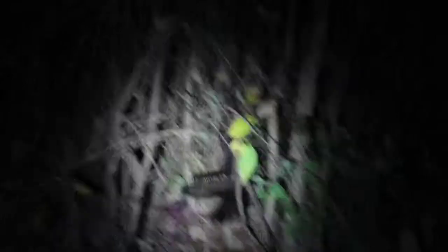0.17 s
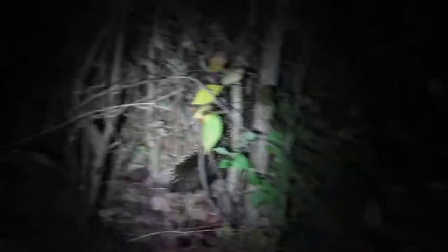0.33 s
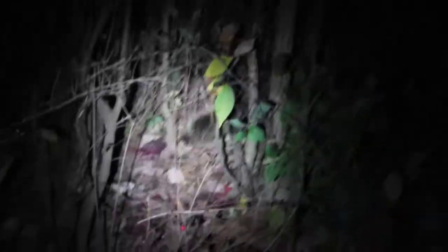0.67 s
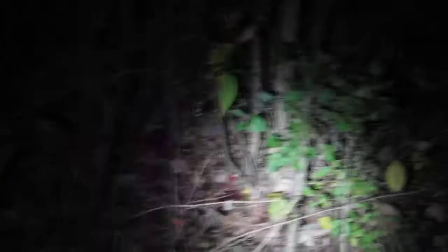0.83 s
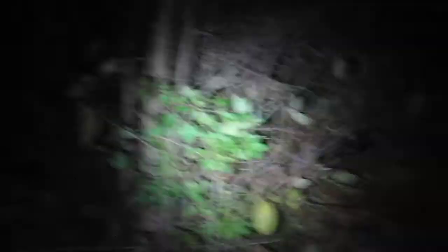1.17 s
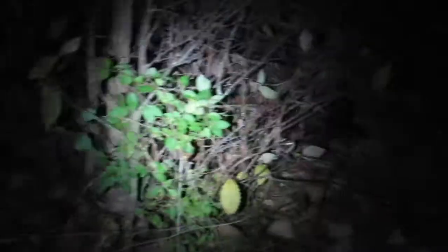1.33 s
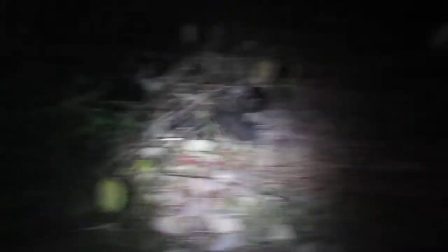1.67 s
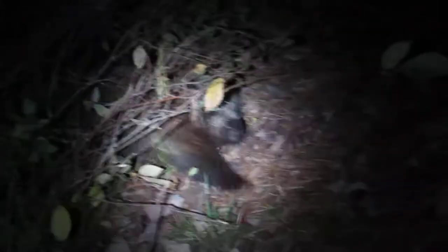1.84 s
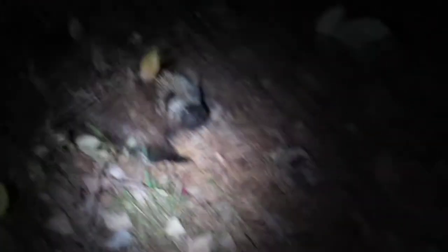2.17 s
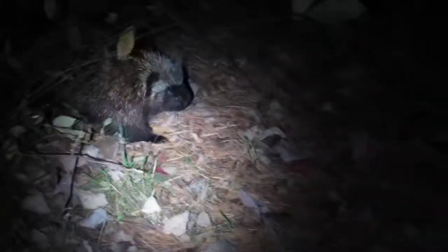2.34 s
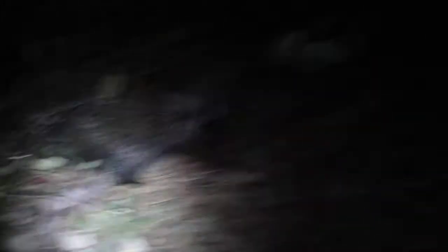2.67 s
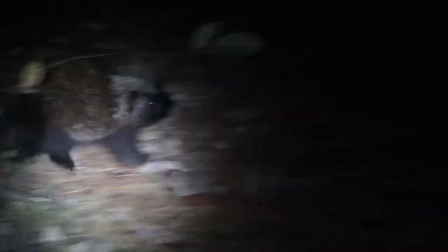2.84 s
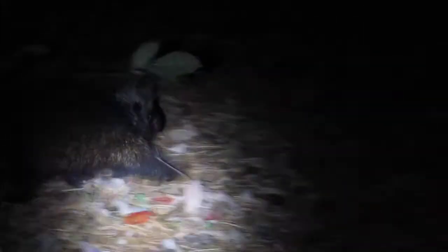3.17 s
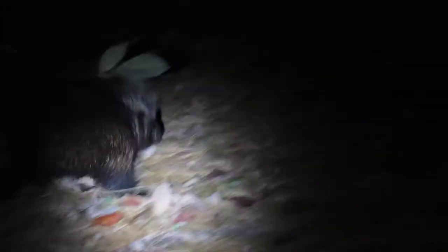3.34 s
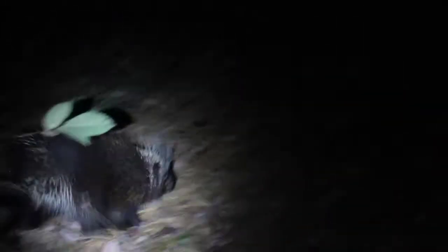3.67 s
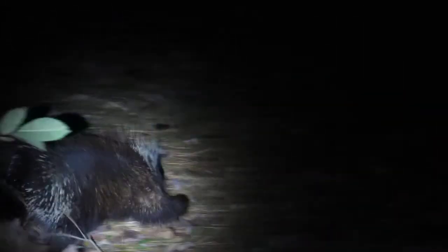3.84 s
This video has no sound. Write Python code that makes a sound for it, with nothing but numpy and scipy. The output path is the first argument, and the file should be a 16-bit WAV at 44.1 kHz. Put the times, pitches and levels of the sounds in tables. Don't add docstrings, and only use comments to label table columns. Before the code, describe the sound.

Crisp leaves crackle under an animal and nearby footsteps in a quiet dark forest

```python
import sys
import numpy as np
from scipy import signal
from scipy.fft import rfft, irfft, next_fast_len
from scipy.io import wavfile

SR = 44100
rng = np.random.default_rng(int(sys.argv[2]) if len(sys.argv) > 2 else 0)


def voltage_ratio(level):
    return 10 ** (np.asarray(level, float) / 20)


def unload_audio(sound):
    columns = np.transpose(np.atleast_2d(sound))
    steps = np.round(np.clip(columns, -1, 1) * 32767)
    wavfile.write(sys.argv[1], SR, steps.astype(np.int16))


N = 176400
SECONDS = np.arange(N) / SR
SIZE = next_fast_len(N + 8192)
HZ = np.maximum(np.arange(SIZE // 2 + 1) * SR / SIZE, 1)


def in_time(rows):
    return np.interp(SECONDS, *np.transpose(rows))


def colour(points, hz=HZ):
    table_hz, table_db = np.transpose(points)
    return voltage_ratio(np.interp(np.log(hz), np.log(table_hz), table_db))


def drift(rate_hz):
    knots = rng.standard_normal(int(N / SR * 400) + 2)
    return np.interp(SECONDS * rate_hz, np.arange(len(knots)), knots) * 1.22


def noise(spectrum, alike):
    white = rng.standard_normal((3, SIZE))
    pair = np.sqrt(alike) * white[2] + np.sqrt(1 - alike) * white[:2]
    coloured = irfft(rfft(pair) * colour(spectrum) * (HZ > 19), SIZE)[:, :N]
    return coloured / np.sqrt(np.mean(coloured ** 2) + 1e-20)


# frequency in Hz, level in dB.
NIGHT_SPECTRUM = [(29, -19), (50, -0.5), (189, -13), (261, -14), (859, -22), (1060, -17), (1270, -20.5),
                  (2800, -23), (5140, -26), (12000, -28), (15600, -68), (22000, -120)]


def night():
    return voltage_ratio(-53 - 4.5) * noise(NIGHT_SPECTRUM, alike=0.73)


# time in seconds, level in dB.
GUST_LEVEL = [(0.08, -68), (0.13, -103), (1.52, -59), (2.3, -68), (2.91, -48), (3.34, -65), (3.44, -50),
              (3.58, -60), (3.79, -54.5), (3.82, -71), (3.87, -52), (4.0, -64)]
# frequency in Hz, level in dB.
AIR_SPECTRUM = [(11, -43), (24, 5.5), (62, -5.5), (79, -5.5), (107, -28.5), (250, -21), (320, -27),
                (550, -120)]


def air():
    lumps_db = 1.5 * np.array([drift(5.0), drift(4.77)])
    port_db = [[-0.8], [2.5]]
    return voltage_ratio(in_time(GUST_LEVEL) + lumps_db + port_db) * noise(AIR_SPECTRUM, alike=0.47)


def footfalls(rows):
    power = 1e-12
    for peak_s, db, rise_s, fall_s in rows:
        away = np.abs(SECONDS - peak_s) / np.where(SECONDS < peak_s, rise_s, fall_s)
        power = power + voltage_ratio(2 * (db - 6 * away ** 1.6))
    return power


def fizz(clicks, t60_s, db):
    alike = 0.57
    decay = voltage_ratio(-120 / (t60_s * SR))
    white = rng.standard_normal((2, len(clicks)))
    pair = np.array([white[0], alike * white[0] + np.sqrt(1 - alike ** 2) * white[1]])
    tail_power = signal.lfilter([0, 1 - decay], [1, -decay], clicks ** 2 + 1e-30)
    return clicks + voltage_ratio(db) * np.sqrt(tail_power) * pair


def heard(clicks, hz, cycles, lag, pan_db, size=SIZE, order=1):
    freq = np.arange(size // 2 + 1) * SR / size
    x = 1j * freq / hz
    late = np.exp(-2j * np.pi * freq / SR * np.array([[lag + 8], [8]]))
    ring = (x / cycles / (1 + x ** 2 + x / cycles)) ** order
    return rfft(clicks, size) * ring * late * voltage_ratio([[pan_db / 2], [-pan_db / 2]])


def cracks(power, spectrum, per_s, spread_db, clump_db, cycles, lag, lag_spread, pan_db, fizz_db, tilt_db=0):
    sizes = voltage_ratio(spread_db * np.minimum(rng.exponential(1, N), 4.0)) * rng.choice([-1, 1], N)
    busy = (power / power.mean()) ** 0.3
    born = rng.random(N) < per_s * busy * voltage_ratio(clump_db * drift(60)) / SR
    loudness = np.sqrt(power / np.clip(busy, 1e-3, SR / per_s))
    clicks = sizes * born / np.sqrt(np.mean(sizes ** 2) * per_s / SR) * loudness
    leaf = rng.integers(0, 18, N)
    out = 0
    for k, hz in enumerate(np.geomspace(250, 13000, num=18)):
        patchy_db = 1.4 * drift(16)
        gain = voltage_ratio(patchy_db + tilt_db * np.log2(hz / 5000)) * colour(spectrum, hz)
        own = gain / np.sqrt(hz / 4000)
        torn = fizz(clicks * (leaf == k) * own, 0.045, fizz_db)
        out = out + heard(torn, hz, cycles, lag + lag_spread * (k % 3 - 1), pan_db)
    return irfft(out, SIZE)[:, :N]


# time in seconds, level in dB.
STIRRING = [(.08, -52.5), (.3, -71), (.5, -64), (.56, -56.5), (.585, -55), (.85, -50.5), (.98, -53.5),
            (1.06, -50), (1.6, -49), (1.8, -44.5), (2.0, -51.5), (2.35, -55.5), (2.38, -47), (2.7, -49),
            (2.96, -50), (3.2, -50), (3.52, -44.5), (3.75, -52.5)]
# peak in seconds, level in dB, rise in seconds, fall in seconds.
CRISP_STEPS = [(.262, -49.5, 0.071, 0.03), (.348, -48, 0.0062, 0.013), (.578, -50, 0.0037, 0.041),
               (.689, -49, 0.084, 0.089), (.80, -71, .01, 0.043), (1.032, -46.5, 0.032, 0.013),
               (1.118, -46, 0.05, 0.032), (1.205, -50, 0.029, 0.028), (1.338, -47.5, 0.042, 0.01),
               (1.426, -48, 0.033, 0.14), (1.665, -41, 0.015, 0.016), (1.702, -35, 0.05, 0.042),
               (1.912, -41.5, 0.035, 0.036), (2.111, -58, 0.023, 0.014), (2.39, -57, 0.013, .03),
               (2.444, -45, 0.07, 0.018), (2.595, -43, 0.038, 0.028), (2.69, -43, 0.028, 0.015),
               (2.769, -36, 0.012, 0.01), (2.888, -46.5, 0.19, 0.019), (3.011, -42, 0.0091, 0.011),
               (3.086, -43.5, 0.035, 0.1), (3.278, -44, 0.0052, 0.017), (3.405, -35.5, 0.021, .045),
               (3.62, -41.5, 0.0078, 0.0091), (3.677, -47.5, 0.0018, 0.0023), (3.79, -44.5, 0.0062, 0.017),
               (3.831, -47.5, 0.0019, 0.013), (3.905, -44.5, 0.038, 0.047), (3.95, -39.5, 0.019, 0.028)]
# frequency in Hz, level in dB.
LEAF_SPECTRUM = [(200, -20.5), (600, -15), (1500, -13), (3000, -5), (6000, 0), (9000, -1), (13000, 0.5)]
# time in seconds, tilt in dB per octave.
LEAF_DRYNESS = [(.1, 0.5), (.25, -2), (.6, 0), (.95, -2), (1.6, 0.1), (1.7, 0.7), (1.9, 0.4), (2.3, -3.1),
                (2.42, 0), (2.6, -1.5), (2.78, 0.5), (2.9, -1.6), (3.1, -0.5), (3.3, -1), (3.41, 2),
                (3.6, -1.65), (3.9, -1), (4.0, 0.5)]


def leaves():
    power = voltage_ratio(2 * in_time(STIRRING)) + footfalls(CRISP_STEPS)
    return voltage_ratio(7.5) * cracks(power, LEAF_SPECTRUM, per_s=7000, spread_db=0.0, clump_db=1.53, cycles=2.15,
                             lag=0.55, lag_spread=1.0, pan_db=-1.24, fizz_db=0,
                             tilt_db=in_time(LEAF_DRYNESS))


# peak in seconds, level in dB, rise and fall in seconds.
HEAVY_STEPS = [(.155, -55, 0.0062, 0.042), (.262, -51.5, 0.01, 0.0127), (1.70, -46, 0.06, 0.021),
               (1.91, -67.5, 0.014, 0.017), (2.43, -56, 0.019, 0.028), (2.54, -46.5, 0.0069, 0.065),
               (2.576, -47, 0.014, 0.011), (2.615, -56.5, 0.02, 0.03), (2.648, -47, 0.035, 0.027),
               (2.853, -44, 0.0028, 0.007), (2.885, -49, 0.01, 0.014), (3.005, -55, 0.027, 0.013),
               (3.415, -66, 0.027, 0.021), (3.62, -62, 0.01, .015), (3.91, -55, 0.018, 0.029)]
# frequency in Hz, level in dB.
TREAD_SPECTRUM = [(200, -14), (600, -14.5), (1100, -4), (2000, -1.5), (4000, -5), (9000, -34)]


def treads():
    power = footfalls(HEAVY_STEPS) + voltage_ratio(2 * (in_time(STIRRING) - 13.0))
    return voltage_ratio(14.0) * cracks(power, TREAD_SPECTRUM, per_s=1100, spread_db=1.0, clump_db=5.5, cycles=2.87,
                              lag=0.37, lag_spread=1.74, pan_db=2.0, fizz_db=-6)


def singles(rows, cycles, wide_db, boost_db, lag, t60_s, fizz_db, order):
    size = 4096
    out = np.zeros((2, N + size))
    for peak_s, db, hz in rows:
        impulse = np.arange(3000) == 0
        click = fizz(voltage_ratio(db + boost_db) * SR / hz * impulse, t60_s, fizz_db)
        ring = heard(click, hz, cycles, lag, -0.6, size=size, order=order)
        tick = voltage_ratio(wide_db) * hz / 5000 * heard(click, 7500, 1.0, lag, -0.77, size=size)
        start = int(peak_s * SR)
        out[:, start:start + size] += irfft(ring + tick, size)
    return out[:, :N]


# time in seconds, peak in dB, pitch in Hz.
TWIG_KNOCKS = [(.0735, -45.5, 297), (.1455, -35, 1620), (.2601, -34, 2620), (.717, -44, 310),
               (1.702, -30.5, 1210), (1.716, -28, 1850), (2.243, -37.5, 2020), (2.287, -41, 1990),
               (2.524, -32, 2070), (2.573, -33, 1160), (2.5805, -26.5, 1050), (2.644, -31, 1410),
               (2.8535, -34.5, 810), (2.877, -32, 2100), (2.998, -34, 1150), (3.009, -32, 1250),
               (3.183, -30, 1550), (3.614, -39, 2330), (3.6865, -37.5, 1250)]
# time in seconds, peak in dB, pitch in Hz.
MORE_KNOCKS = [(.1555, -45, 1300), (.177, -42, 1550), (.575, -41.5, 1270), (.9893, -38.5, 1940),
               (1.0735, -37.5, 1850), (1.0893, -43, 1460), (1.2333, -41.5, 2250), (1.6033, -40.5, 1660),
               (1.694, -35, 1660), (1.7018, -24.5, 3680), (1.9103, -38, 2780), (2.0816, -47, 1500),
               (2.3312, -38.5, 2660), (2.5695, -28, 2280), (2.5765, -37, 805), (2.6472, -39, 1570),
               (2.6525, -35, 1410), (2.848, -36, 960), (2.884, -32.5, 2420), (2.889, -31, 1790),
               (2.959, -34, 1490), (2.975, -43, 1680), (3.3343, -38.5, 2160), (3.4136, -40, 2670),
               (3.622, -40, 2500), (3.9272, -31, 2540), (0.696, -51.5, 457), (3.639, -34, 2880)]


def knocks():
    return singles(TWIG_KNOCKS + MORE_KNOCKS, cycles=1.7, wide_db=-26.0, boost_db=-6.5, lag=0.38,
                   t60_s=0.018, fizz_db=-3, order=2)


# time in seconds, peak in dB, pitch in Hz.
LEAF_SNAPS = [(0.1534, -33, 4000), (0.2968, -32, 4840), (0.3282, -38, 4940), (0.4095, -35, 5000),
              (0.5756, -31.5, 4930), (0.609, -30.5, 4860), (0.796, -25, 8100), (0.8189, -27.5, 3620),
              (0.9278, -31.5, 6900), (1.6458, -43, 5340), (1.6574, -21, 8000), (1.6805, -18, 5500),
              (1.7022, -17, 4800), (1.7974, -27, 7700), (1.9109, -22, 5270), (2.2436, -28, 5400),
              (2.309, -31, 4370), (2.331, -33, 5240), (2.4447, -32, 4710), (2.5252, -32.5, 4800),
              (2.641, -22, 4870), (2.69, -36, 7800), (2.7652, -32, 5400), (3.0612, -40, 4840),
              (3.0856, -32, 4690), (3.3834, -24, 5500), (3.521, -30, 5300), (3.6368, -27.5, 4500),
              (3.675, -20.5, 5250), (3.7907, -27, 4640), (3.8293, -24, 4800)]
# time in seconds, peak in dB, pitch in Hz.
MORE_SNAPS = [(.2395, -35, 5340), (0.4237, -42, 6400), (.5618, -42, 5250), (.737, -30, 3100),
              (0.742, -32, 8200), (1.136, -32, 4900), (1.3384, -30, 4870), (1.5378, -37, 5400),
              (1.626, -38, 5300), (1.689, -22, 5000), (1.693, -28, 4700), (1.711, -24, 4500),
              (1.7216, -26, 5400), (1.749, -38, 4870), (1.9284, -29, 4900), (1.964, -41, 4740),
              (2.1165, -37, 5900), (2.1842, -43, 3450), (2.422, -39, 4930), (2.473, -33, 4870),
              (2.5314, -26, 4800), (2.57, -26, 4300), (2.5733, -30, 4400), (2.582, -30, 4400),
              (2.853, -30, 3800), (2.894, -32, 3300), (2.9377, -30, 3270), (3.008, -38, 7300),
              (3.016, -46, 4700), (3.3123, -34, 5250), (3.388, -36, 4500), (3.405, -24, 7800),
              (3.414, -20, 4200), (3.899, -27, 4230), (3.926, -31, 3520), (3.947, -22, 5240)]


def snaps():
    return singles(LEAF_SNAPS + MORE_SNAPS, cycles=3.15, wide_db=-9.5, boost_db=-16.5, lag=0.55,
                   t60_s=0.017, fizz_db=7, order=1)


def scene():
    return night() + air() + leaves() + treads() + knocks() + snaps()


def top_cut(x):
    return signal.sosfilt(signal.butter(12, 15860, fs=SR, output="sos"), x)


def record(dry):
    port_hz, port_q = np.array([[5250], [7880]]), np.array([[3.94], [3.36]])
    cut_hz, port_db = np.array([[8900], [7690]]), np.array([[-0.5], [1.53]])
    x = 1j * HZ / port_hz
    y = 1j * HZ / cut_hz
    cavity = 1 / (1 + x / port_q + x ** 2)
    cut = 1 / (1 + 1.212 * y + y ** 2)
    port = (cavity * cut + voltage_ratio(-29.5)) * voltage_ratio(port_db)
    gate = np.clip((SECONDS - 0.071) / 0.0022, 0, 1)
    hiss = voltage_ratio(-67) * rng.standard_normal((2, N))
    wet = rfft(dry * gate, SIZE) * port + rfft(hiss * gate, SIZE)
    mix = irfft(wet * (HZ < 15790), SIZE)[:, :N] * (gate > 0)
    return top_cut(mix)


dry = scene()
out = record(dry)
unload_audio(out)
```